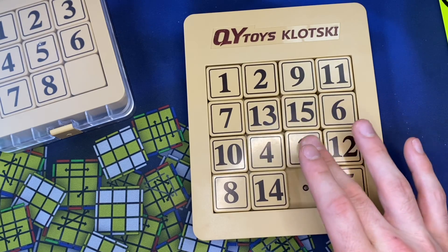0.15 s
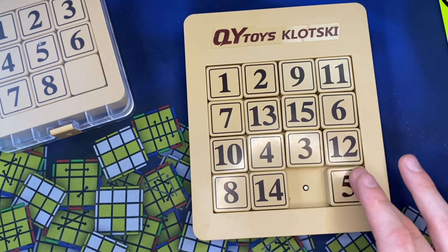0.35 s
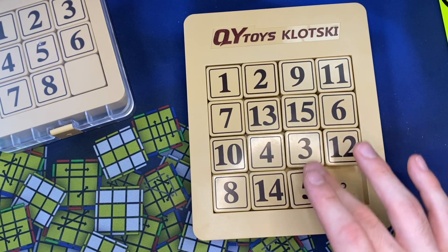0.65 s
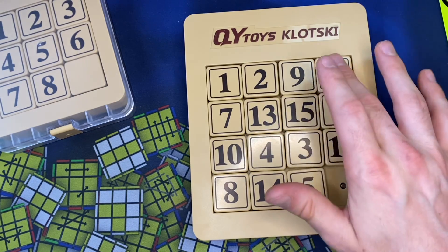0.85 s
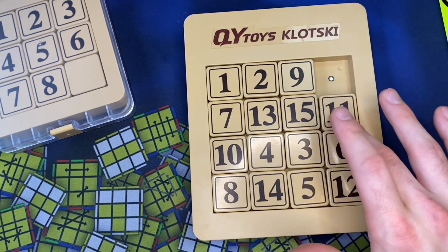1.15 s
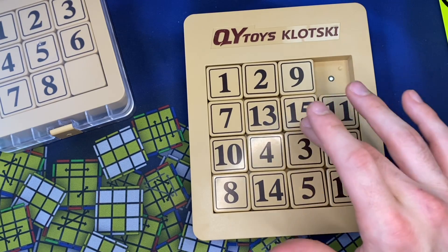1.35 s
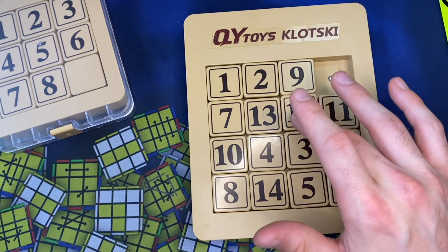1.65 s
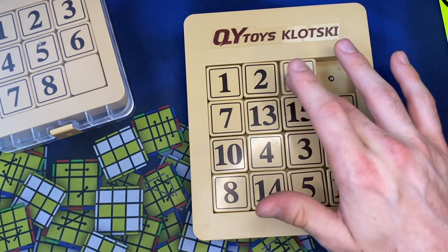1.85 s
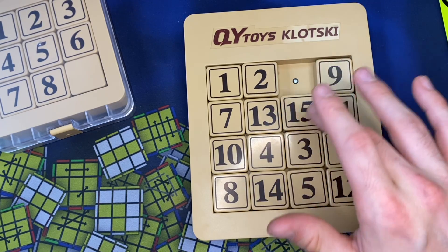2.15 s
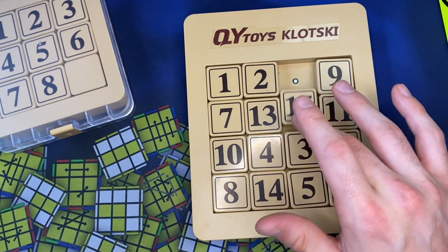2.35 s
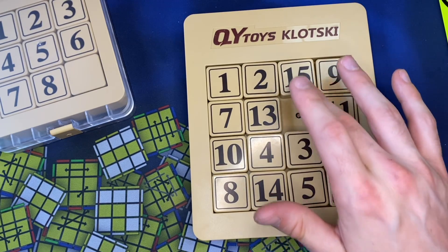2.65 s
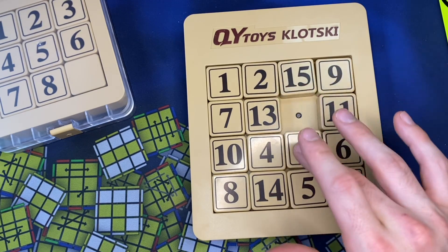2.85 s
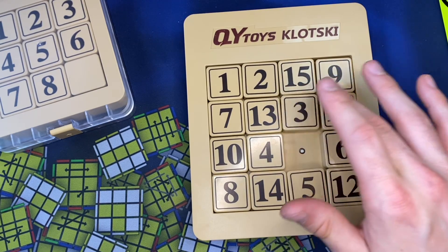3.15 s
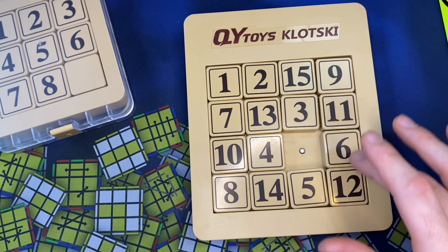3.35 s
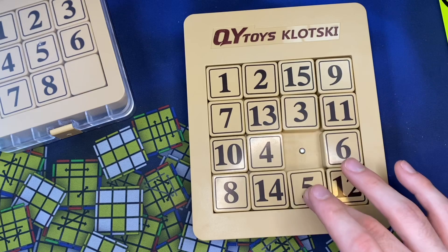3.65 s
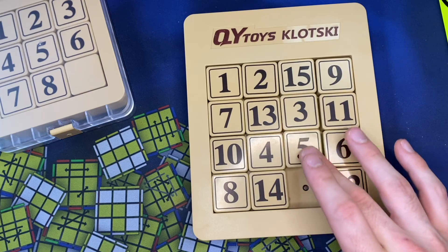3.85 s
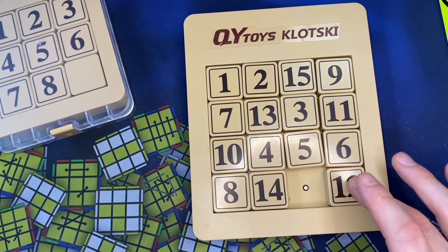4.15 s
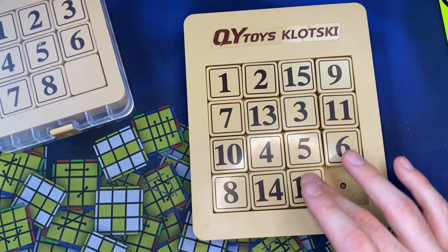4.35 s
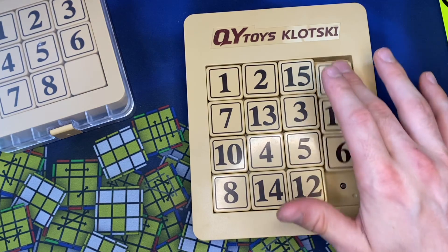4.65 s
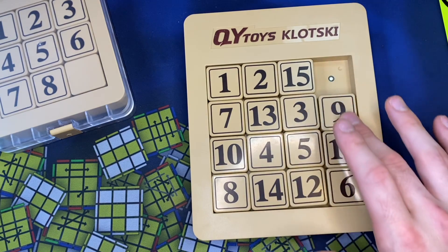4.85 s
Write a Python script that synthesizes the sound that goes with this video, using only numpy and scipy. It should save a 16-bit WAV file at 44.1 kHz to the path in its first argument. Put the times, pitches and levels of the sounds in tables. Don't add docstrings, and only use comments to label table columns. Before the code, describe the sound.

Sliding-puzzle tiles moved by fingers on a table, heard close and dry with a short room tail. Each move starts with a small tick, rasps grittily for a fraction of a second and ends in a bright plastic click with a hollow tray knock and tiny rebounds. Strength varies, with two sharp loud stops, one early and one near the end. Faint fingertip taps and low machine hum fill the gaps.

```python
import sys
import numpy as np
from scipy import signal
from scipy.io import wavfile
from scipy.ndimage import uniform_filter1d

SR = 44100
rng = np.random.default_rng(int(sys.argv[2]) if len(sys.argv) > 2 else 0)


def master_out(mix):
    frames = np.transpose(np.atleast_2d(mix))
    ceiling = np.clip(frames, -1, 1)
    pcm = np.round(ceiling * 32767).astype(np.int16)
    wavfile.write(sys.argv[1], SR, pcm)


def magnitude_from_level(level_db):
    exponent = np.asarray(level_db, float) / 20
    return 10 ** exponent


N = 220411

# centre in Hz, width in Hz, level in dB.
TRAY_MODES = [(876.4, 210, -1.5), (1184, 520, -2.5), (1457, 390, -0.5), (1800, 610, 0.5), (2161, 340, -2),
              (2358, 370, -4), (2870, 670, -3), (3483, 650, -9), (4330, 1200, -12.5)]
# centre in Hz, width in Hz, level in dB.
TILE_MODES = [(5050, 340, -6.5), (5720, 1100, 2.5), (6600, 770, 4), (7820, 1200, -6.5), (7390, 1400, 3),
              (8900, 1100, 1.5)]
# centre in Hz, width in Hz, level in dB.
EDGE_MODES = [(11200, 1300, 1.5), (12990, 2200, -5), (14360, 2500, -13), (14500, 2500, -8)]


def evened(x):
    return x / np.sqrt(np.mean(x ** 2) + 1e-20)


def smoothed(x, size, axis=-1):
    return uniform_filter1d(uniform_filter1d(x, size, axis), size, axis)


def read(points, hz):
    f, value = np.transpose(points)
    return np.interp(np.log(hz + 1), np.log(f + 1), value)


def add(mix, start_s, sound):
    part = mix[round(start_s * SR):][:len(sound)]
    part += sound[:len(part)]


def hum():
    # frequency in Hz, density in dB per Hz.
    spectrum = [(24, -0.5), (52, -5), (80, -9), (120, -11.5), (200, -19), (400, -25.5), (600, -33),
                (800, -26.5), (1250, -26), (1750, -32.5), (2600, -34.5), (4300, -43.5), (6500, -39.5),
                (15900, -43)]
    # centre in Hz, width in Hz, level in dB above the hum.
    lines = [(230, 11, 6), (1200, 49, 3.5)]
    # time in seconds, level in dB.
    rumble = [(0.0, -64), (0.38, -66.5), (0.771, -65.5), (1.151, -62), (1.54, -65.5), (1.92, -62.5),
              (2.31, -63), (2.69, -56.5), (3.08, -63.5), (3.459, -65.5), (3.85, -57.5), (4.23, -61.5),
              (4.62, -59.5), (5.0, -60.5)]
    level_db = -64
    hop, size = 1024, 4096
    frames, hz = N // hop + 5, np.fft.rfftfreq(size, 1 / SR)

    real, imag, patches = rng.standard_normal((frames, size // 2 + 1, 3)).T
    patches = evened(uniform_filter1d(uniform_filter1d(patches, 4, 0), 12, 1))
    patch_depth_db = read([(60, 1.5), (400, 0.79), (4000, 0.35)], hz)
    lines_db = sum(db * np.exp(-((hz - f) / width) ** 2) for f, width, db in lines)

    s, rumble_db = np.transpose(rumble)
    swell_db = np.interp(np.arange(frames) * hop / SR, s, rumble_db - rumble_db.mean())
    swell_share = read([(100, 0.71), (170, 0.26)], hz)

    moving_db = patch_depth_db[:, None] * patches + swell_share[:, None] * swell_db
    z = (real + 1j * imag) * magnitude_from_level((read(spectrum, hz) + lines_db)[:, None] + moving_db)
    noise = signal.istft(z, nperseg=size, noverlap=size - hop)[1][:N]
    return magnitude_from_level(level_db) * evened(noise)


def drones():
    # time in seconds, low motor in dB, high motor in dB.
    fades = [(0.0, -94, -79), (0.17, -67, -67), (0.76, -69.5, -93), (0.89, -64.5, -62.5), (1.4, -73, -86),
             (1.54, -64.5, -62), (1.74, -66.5, -76.5), (1.92, -58.5, -61), (2.27, -76, -78),
             (2.92, -63.5, -74), (2.98, -71, -62), (3.52, -71, -90), (3.63, -66, -87.5), (4.01, -74, -64),
             (4.13, -64.5, -77.5), (4.48, -67, -92), (4.81, -67, -67.5), (5.0, -84, -92)]
    motors_hz, waver_hz, wavers_per_s = (53.8, 88.2), 2.5, 11
    t, out = np.arange(N) / SR, np.zeros(N)
    s, *levels_db = np.transpose(fades)
    for motor_hz, db in zip(motors_hz, levels_db):
        waver = np.interp(t * wavers_per_s, np.arange(60), rng.standard_normal(60))
        phase = 2 * np.pi * np.cumsum(motor_hz + waver_hz * waver) / SR
        out += np.sqrt(2) * magnitude_from_level(np.interp(t, s, db - 0.5)) * np.sin(phase)
    return out


def thumps():
    # start in seconds, level in dB, pitch in Hz.
    landings = [
        (.87, -57, 90),
        (1.453, -54.5, 61),
        (1.865, -54, 65.3),
        (4.12, -65, 109),
        (4.328, -60.5, 106),
        (4.612, -60.5, 120),
    ]
    rise_s = 0.013
    t, out = np.arange(6000) / SR, np.zeros(N)
    swell = t / rise_s * np.exp(1 - t / rise_s)
    for s, db, hz in landings:
        add(out, s, magnitude_from_level(db) * swell * np.sin(2 * np.pi * hz * t))
    return out


def room(x, first_s, near_db, near_t60_s):
    # frequency in Hz, t60 in seconds.
    decay = [(300, 0.26), (1000, 0.21), (2500, 0.21), (4500, 0.27), (7000, 0.24), (11000, 0.24),
             (15000, 0.18)]
    out, size, spacing = np.zeros(N), SR // 2, 10
    turn = np.arange(N) / SR * np.pi / .23
    for k in range(3):
        taps = np.zeros(size)
        at = np.arange(round(first_s * SR), size - spacing, spacing)
        at = at + rng.integers(0, spacing, len(at))
        taps[at] = rng.choice([-1., 1.], len(at))
        hz, t, z = signal.stft(taps, SR, nperseg=128)
        far = magnitude_from_level(-60 * t / read(decay, hz)[:, None])
        near = magnitude_from_level(near_db - 60 * t / near_t60_s)
        tail = signal.istft(z * (far + near), SR, nperseg=128)[1]
        share = np.sqrt(2 / 3) * np.cos(turn + k * np.pi / 3)
        out += signal.fftconvolve(x * share, tail / np.linalg.norm(tail))[:N]
    return out


def ring(modes, favoured_hz=1000, favour_db=0, hardness_db=0, reach=0.098, steep=1.695):
    centre, width, db = np.transpose(modes)[..., None]
    hz = abs(np.fft.fftfreq(2048, 1 / SR)) + 1
    favour = np.exp(-(np.log(centre / favoured_hz) / reach) ** 2)
    octaves = np.log2(np.minimum(centre, 3200) / 1800)
    db = db + favour_db * favour + hardness_db * octaves
    power = magnitude_from_level(2 * db) / (1 + ((hz - centre ** 2 / hz) / width) ** 2) ** steep
    log_gain = np.log(power.sum(0) + 1e-9) / 2
    minimum_phase = np.exp(np.conj(signal.hilbert(log_gain)))
    return np.fft.ifft(minimum_phase).real[:1024]


def grit(per_s, spread_db, lumps_db):
    catches = rng.standard_normal(N) * (rng.random(N) < per_s / SR)
    size_db = spread_db * np.minimum(rng.exponential(1, N), 4)
    lumps = evened(smoothed(rng.standard_normal(N), 150))
    return catches * magnitude_from_level(size_db + lumps_db * lumps)


def wander(modes, force, drift_db, hardness_db=0):
    out, step = np.zeros(N), 256
    for mode in modes:
        chance = rng.standard_normal(N // step + 2)
        drift = np.interp(np.arange(N) / step, np.arange(len(chance)), evened(uniform_filter1d(chance, size=5)))
        tilt_db = hardness_db * np.log2(mode[0] / 1800)
        own_force = np.roll(force, int(mode[0]))
        out += magnitude_from_level(drift_db * drift + tilt_db) * signal.oaconvolve(own_force, ring([mode]))[:N]
    return out


def slides():
    # time in seconds, scrape in dB.
    pushes = [
        [(0, -46.5), (.03, -48), (.06, -48.5), (.086, -49)],
        [(.425, -69), (.44, -49.5), (.465, -51.5), (.49, -52.5), (.53, -52), (.57, -52), (.61, -48),
         (.635, -58), (.66, -67)],
        [(.903, -36.5), (.93, -43.5), (.965, -43), (.985, -46.5), (1.03, -44.5), (1.072, -45), (1.078, -39.5),
         (1.087, -31)],
        [(1.864, -56), (1.885, -46.5), (1.915, -43.5), (1.945, -43), (1.965, -44), (1.985, -50), (2.01, -43.5),
         (2.04, -51.5), (2.075, -69)],
        [(2.342, -55.5), (2.39, -43), (2.415, -45.5), (2.44, -48.5), (2.475, -44.5), (2.506, -48)],
        [(2.876, -57), (2.89, -47.5), (2.93, -46), (2.97, -49), (3.013, -37.5)],
        [(3.685, -67.5), (3.71, -51), (3.73, -52.5), (3.755, -45), (3.79, -46), (3.825, -47), (3.862, -44.5)],
        [(4.198, -66), (4.215, -46), (4.255, -40.5), (4.28, -44.5), (4.305, -43), (4.328, -45.5)],
        [(4.643, -46), (4.67, -44.5), (4.7, -41.5), (4.72, -44.5), (4.74, -42.5), (4.785, -39.5)],
    ]
    # tile share at start in dB, at end in dB, brightness in dB,
    # hardness in dB per octave.
    seating = [(-1, -2.5, -14, -0.5), (-3.5, 0, -11.5, 2.5), (-8.5, 0.5, -20.5, 0.5), (-4.5, -6, -9.5, 1),
               (-6, 0, -10, 3), (-1, -7, -11, 1), (3, -1.5, -12, 6), (0.5, -0.5, -12.5, 4.5),
               (-2, -5, -8, 1)]
    # start in seconds, length in seconds,
    # tray in dB, tile in dB, brightness in dB.
    brushes = [(.326, 0.034, -67, -70, 3), (.358, 0.037, -67, -58, -11), (.38, 0.027, -75, -79, -13),
               (0.416, 0.011, -55, -52, -14), (3.58, 0.087, -75.5, -69, -10), (2.5, .022, -71, -66, -5),
               (3.92, 0.047, -56.5, -68.5, -13), (.872, .008, -75, -69, 1), (4.112, 0.053, -82, -67.5, 0),
               (4.605, 0.027, -56.5, -56.5, -6)]
    t, touching = np.arange(N) / SR, np.zeros(N)
    tray_db, tile_db = np.full((2, N), -120.0)
    bright_db, hardness_db = np.zeros((2, N))

    for push, (first_db, last_db, move_bright_db, move_hardness_db) in zip(pushes, seating):
        s, db = np.transpose(push)
        now = (t >= s[0]) & (t < s[-1])
        tray_db[now] = np.interp(t[now], s, db)
        tile_db[now] = tray_db[now] + np.interp(t[now], s[[0, -1]], [first_db, last_db])
        bright_db[now], hardness_db[now] = move_bright_db, move_hardness_db
        touching[now] = 1
    for s, length_s, brush_tray_db, brush_tile_db, brush_bright_db in brushes:
        now = (t >= s) & (t < s + length_s)
        tray_db[now], tile_db[now], bright_db[now] = brush_tray_db, brush_tile_db, brush_bright_db
        touching[now] = 1

    under = grit(7000, spread_db=2.8, lumps_db=1.5)
    along = grit(10000, spread_db=2.2, lumps_db=1.5)
    tray = wander(TRAY_MODES, under, drift_db=2.0, hardness_db=hardness_db)
    tray = tray / np.sqrt(uniform_filter1d(tray ** 2, size=4000))
    tile = evened(wander(TILE_MODES, along, drift_db=1.8))
    rim = evened(wander(EDGE_MODES, along, drift_db=1.0))
    fade = np.clip(2 * uniform_filter1d(touching, size=260) - 1, 0, 1)
    return fade * (magnitude_from_level(tray_db) * tray + magnitude_from_level(tile_db) * (tile + magnitude_from_level(bright_db) * rim))


def strike(direct, sent, start_s, parts, room_db, rise_s, fall_s):
    t = np.arange(500) / SR
    chatter = rng.uniform(-1.12, 1, 500) * t / (t + rise_s) * np.exp(-(t / fall_s) ** 3)
    for db, body, averaged, wetter_db in parts:
        sound = np.convolve(chatter, body)
        loudest = np.sqrt(2 * uniform_filter1d(sound ** 2, 66).max())
        add(direct, start_s, magnitude_from_level(db) * sound / loudest)
        add(sent, start_s, magnitude_from_level(db + room_db + wetter_db) * averaged / np.linalg.norm(averaged) * 8)


def edge_clicks(direct, sent):
    # start in seconds, peak in dB, strongest ring in Hz,
    # brightness in dB.
    touches = [(0.0103, -45, 6800, -16), (.3272, -71, 7410, 2), (.3722, -55, 7600, -17.5),
               (.7104, -68, 5890, -13), (0.8646, -64.5, 8600, -4.5), (1.4494, -60.5, 8230, 0),
               (1.4664, -60, 6640, -23.5), (1.6648, -66.5, 6700, -5.5), (1.829, -67, 7500, -2.5),
               (2.828, -73, 7410, -7), (4.5995, -62.5, 8190, -9), (4.6145, -40.5, 8440, -13)]
    catches = [(.06, -51, 7000, -1), (.063, -43, 8300, -8), (0.4268, -36, 5900, -3.5),
               (0.9063, -50, 6800, -14), (0.91, -46, 7640, -9.5), (.9165, -45.5, 8500, 2),
               (0.9206, -35, 6780, -2), (0.942, -41, 8150, -14), (0.9467, -38, 9150, 0),
               (0.9486, -36.5, 8000, -7), (0.9724, -44, 7930, -7), (1.0217, -46, 8180, -22.5),
               (1.063, -36, 8500, -10), (1.065, -43, 6500, -8), (1.876, -43, 7700, -13.5),
               (1.8908, -43, 8560, 1), (1.8955, -39, 8100, -8), (2.039, -53, 8050, -11),
               (.632, -53, 7500, -6), (2.369, -40, 8550, -3.5), (2.4795, -38.5, 6720, -16.5),
               (2.9019, -45.5, 8850, -6), (2.9295, -50, 7000, -1.5), (2.975, -51.5, 8500, -6),
               (3.7003, -35.5, 7300, -12), (3.833, -46, 8500, -17), (4.208, -36.5, 7500, -7),
               (4.2276, -39.5, 8650, -6), (4.2645, -56, 7200, -16), (4.3073, -41, 6700, -22),
               (4.6433, -44, 8900, -7.5), (4.6498, -39, 8450, -13.5), (4.6553, -46, 7550, -6),
               (4.6654, -37, 9400, -3), (4.68, -39, 8060, 4), (4.6847, -35, 9100, -12),
               (4.737, -46, 8500, -10), (4.7687, -31, 7820, -19)]
    clacks = [(.0841, -26, 6950, -12), (.0903, -34, 7500, -20), (.1, -52, 7000, -10), (.1161, -48, 7550, 0),
              (1.0859, -20.5, 6600, -11.5), (1.0893, -30.5, 7000, -11), (1.0935, -25.5, 5900, -17.5),
              (1.0962, -30, 6800, -14), (2.029, -52, 7970, -16), (2.5037, -40.5, 5760, -9),
              (2.5115, -34, 7140, -5), (3.0105, -32.5, 6670, -6.5), (3.0143, -39, 8060, 0.5),
              (3.851, -37.5, 7540, -3.5), (3.8592, -34, 8300, -22.5), (3.87, -39, 5010, -6),
              (4.3255, -43.5, 7300, -15.5), (4.7797, -38, 7300, -13), (4.7841, -20, 6640, -7.5),
              (4.7893, -21.5, 5900, -16), (4.7935, -40, 6500, -22), (4.798, -42, 6000, -9)]
    for rows, room_db in [(touches, -6), (catches, -7.5), (clacks, -6.5)]:
        for s, db, hz, bright_db in rows:
            tile = ring(TILE_MODES + [(hz, 700, -.6)], favoured_hz=hz, favour_db=6, reach=0.16)
            wide = ring(TILE_MODES, favoured_hz=hz, favour_db=5.5, reach=0.3, steep=1.1)
            rim = ring(EDGE_MODES)
            parts = [(db - .6, tile, wide, 0), (db + bright_db - 2.5, rim, rim, 1.5)]
            strike(direct, sent, s, parts, room_db, rise_s=0.0003, fall_s=0.0025)


def blows(direct, sent):
    # centre in Hz, width in Hz, level in dB.
    table_modes = [(274.8, 280, -4.5), (439, 480, 0.5)]
    # start in seconds, peak in dB, strongest ring in Hz,
    # hardness in dB per octave.
    taps = [(.3274, -53, 2440, -4), (0.362, -52, 2330, 12), (0.3716, -41.5, 1340, 1),
            (.3814, -52, 1200, -5), (0.8674, -49, 2210, -12.5), (1.4608, -40.5, 1940, -8),
            (1.463, -49, 1200, -8.5), (1.467, -46, 1943, -13), (1.8284, -60.5, 1096, -11),
            (4.177, -60.5, 1050, -21), (4.614, -49.5, 1397, 2)]
    bumps = [(.06, -45, 3420, 13), (3.01, -40, 3180, 21), (.4256, -51.5, 3650, 9), (0.905, -38.5, 1040, -3),
             (0.9155, -45, 1664, -3), (0.9428, -38, 2540, -4), (.951, -39, 2223, -1),
             (1.8716, -51.5, 3070, 6), (1.9336, -51, 2030, 1), (1.9365, -41.5, 1200, 6),
             (2.35, -59, 2040, -2), (2.478, -42.5, 1330, -18), (2.8884, -52, 910, -14),
             (2.92, -44, 3200, 18), (2.9447, -42.5, 2110, -7), (2.9932, -46, 1538, -2),
             (3.6999, -53, 1930, -4.5), (3.7271, -48, 1830, -14), (3.7452, -45, 880, -7),
             (3.836, -49, 1770, 6.5), (4.258, -43, 3410, 5), (4.6438, -37, 1000, -5.5),
             (4.6462, -38, 1000, -9), (4.6495, -36.5, 1950, -8), (4.708, -35, 2170, 2),
             (4.7105, -40.5, 2200, 2), (4.7748, -32.5, 2010, -7)]
    stops = [(.0842, -39.5, 3370, 21, -12), (0.0906, -28, 2080, 3.5, -21),
             (0.1088, -40.5, 1150, -35, -14.5), (0.1164, -39.5, 1520, -23, -12),
             (0.6335, -52, 1660, -13, -9.5), (1.0862, -18, 2320, 4, -31), (1.0893, -29, 2720, 6, -34),
             (1.0931, -22.5, 2600, 1.5, -27), (1.0958, -25, 1300, -1.5, -35),
             (1.0982, -30.5, 1050, -6.5, -30.5), (1.1045, -31.5, 1100, -6, -30.5),
             (2.0271, -43.5, 1049, -6, -14), (2.04, -42.5, 2020, -9.5, -29),
             (2.5035, -25.5, 2896, -5.5, -26), (2.5062, -28.5, 1500, 0, -19.5),
             (2.5141, -32, 880, -0.5, -20.5), (2.6342, -55, 1700, 1.5, -23), (3.0144, -34, 2000, -7.5, -22),
             (3.018, -30.5, 2140, 1.5, -17.5), (3.8502, -37, 3220, 4, -23),
             (3.8598, -29.5, 2110, -5.5, -49), (3.863, -34, 2350, 5, -30), (3.8681, -38, 1890, -0.5, -22),
             (3.879, -43, 1932, -15, -9), (4.3254, -34.5, 1843, -2.5, -20), (4.3636, -53.5, 1670, -2, -9),
             (4.7842, -18, 2280, 7.5, -28), (4.789, -19, 2640, 5.5, -33), (4.7929, -24.5, 2800, 21, -25.5),
             (4.7975, -28.5, 2420, -3, -22.5)]
    thud_at_38_db, thud_lag = -26.5, .3
    table = ring(table_modes)
    for rows, room_db in [(taps, -3.5), (bumps, -1.5), (stops, -4)]:
        for s, db, hz, hardness_db, *thud in rows:
            spot = (min(hz, 3600), 190, 1.5)
            tray = ring(TRAY_MODES + [spot], favoured_hz=hz, favour_db=9.0, hardness_db=hardness_db, reach=0.15)
            wide = ring(TRAY_MODES, favoured_hz=hz, favour_db=6.5, hardness_db=.6 * hardness_db,
                        reach=0.31, steep=1.2)
            thud_db = db + (thud[0] if thud else thud_at_38_db - thud_lag * (db + 38.0))
            parts = [(db - .6, tray, wide, 0), (thud_db, table, table, 1.5)]
            strike(direct, sent, s, parts, room_db, rise_s=0.00054, fall_s=0.0019)


def scene():
    direct, sent = np.zeros((2, N))
    edge_clicks(direct, sent)
    blows(direct, sent)
    scrape = magnitude_from_level(-9.0) * slides()
    wet = room(sent + magnitude_from_level(-9.0) * scrape, first_s=.005, near_db=7.0, near_t60_s=0.055)
    return (hum() + drones() + thumps() + wet + scrape + direct)[None]


def band_limit(x):
    return signal.sosfilt(signal.butter(12, 16680, fs=SR, output="sos"), x)


def record(dry):
    limited = signal.oaconvolve(dry, signal.firwin(255, 15950, fs=SR)[None], "same")
    return band_limit(limited)


dry = scene()
out = record(dry)
master_out(out)
```